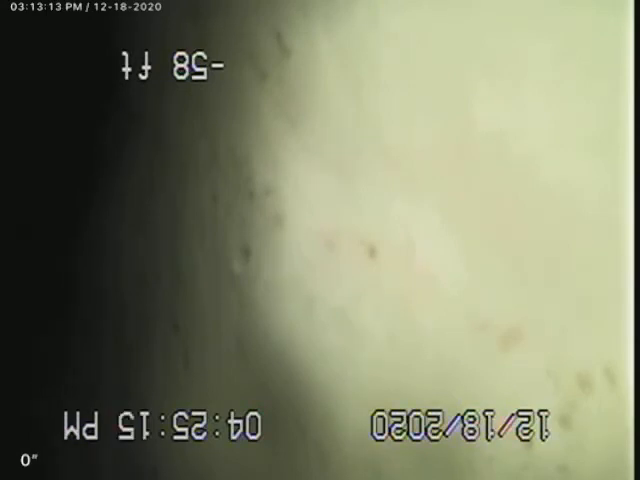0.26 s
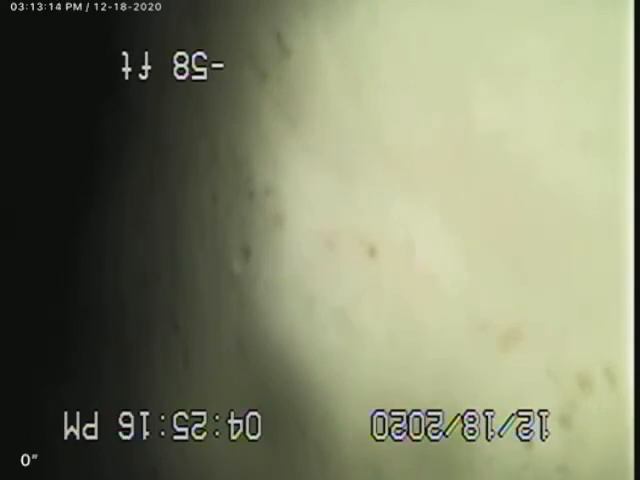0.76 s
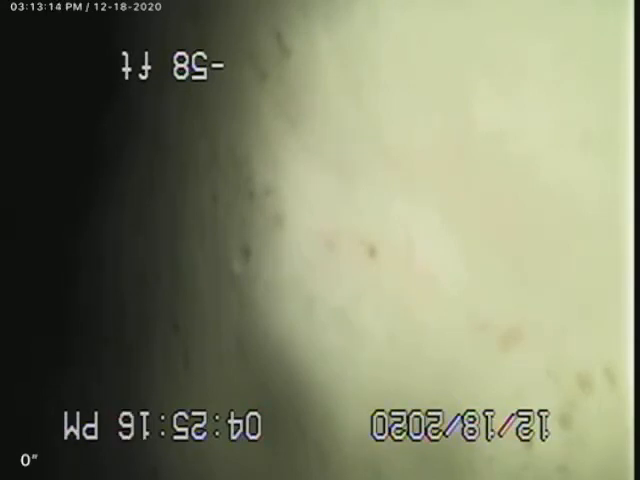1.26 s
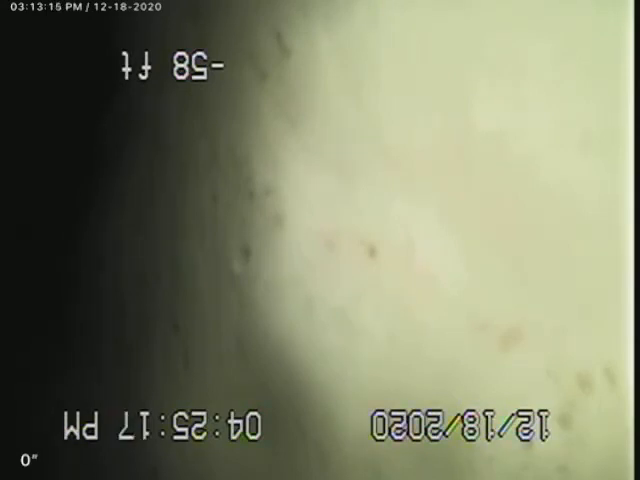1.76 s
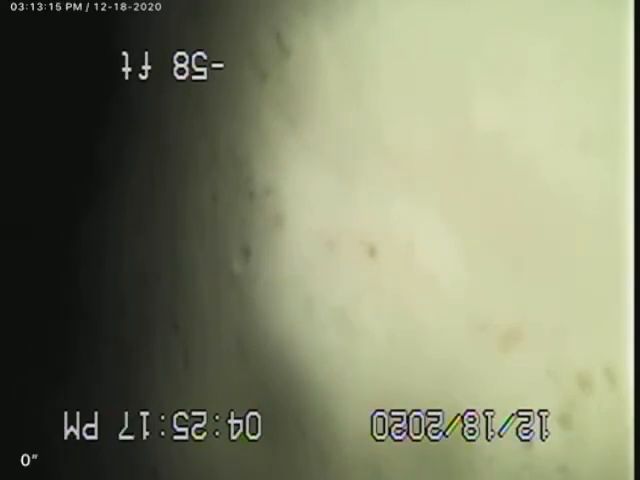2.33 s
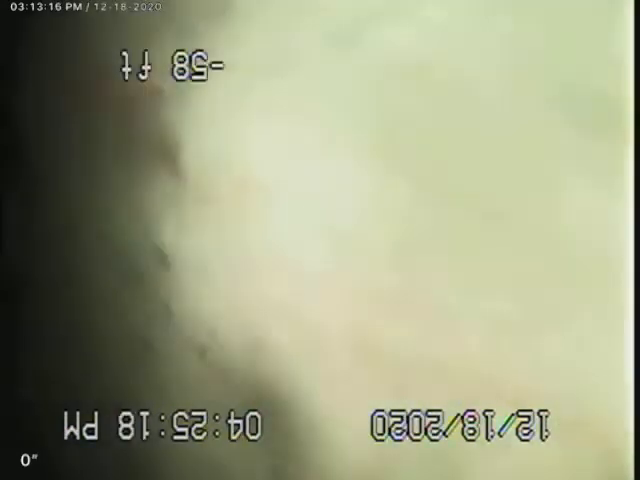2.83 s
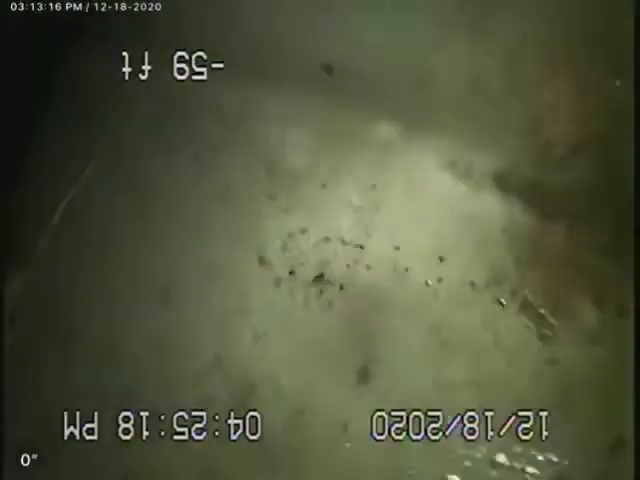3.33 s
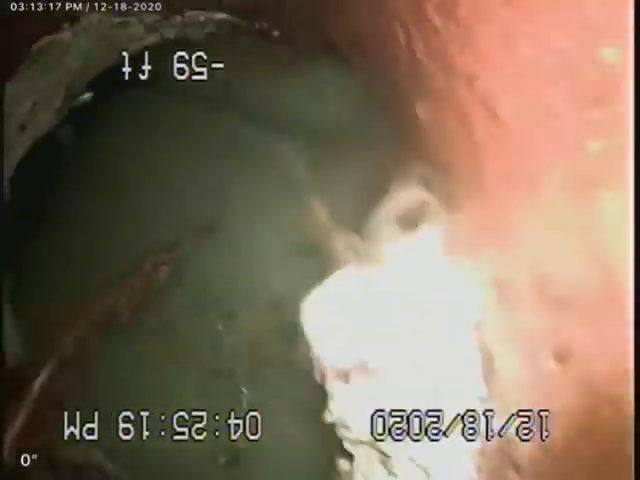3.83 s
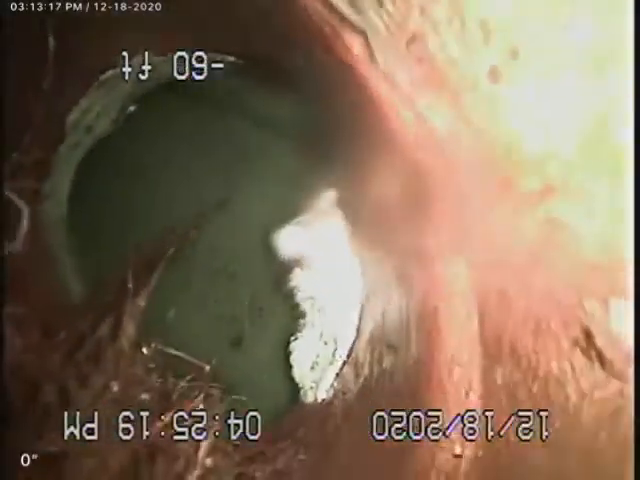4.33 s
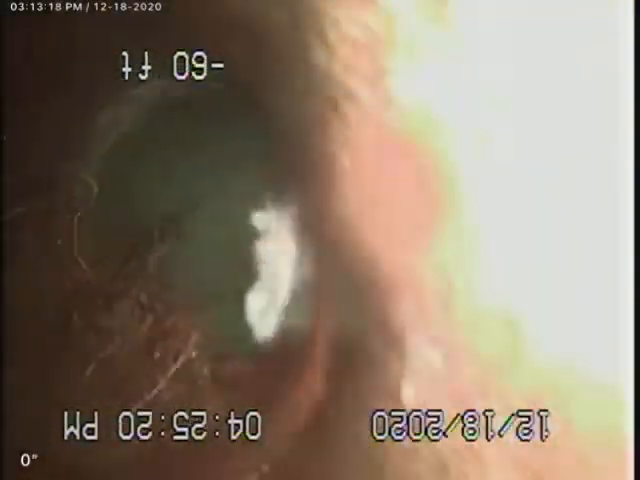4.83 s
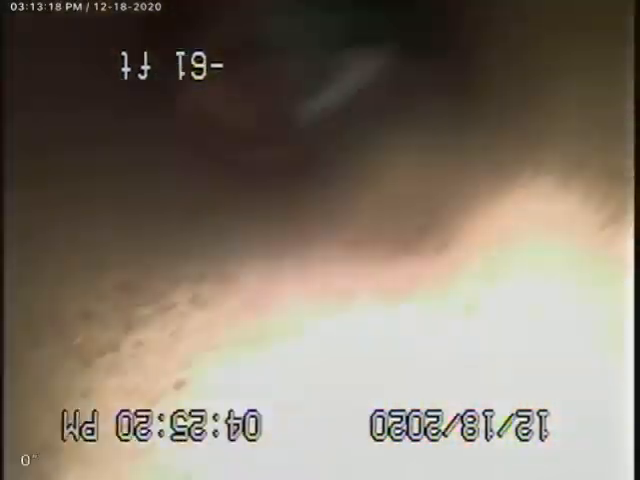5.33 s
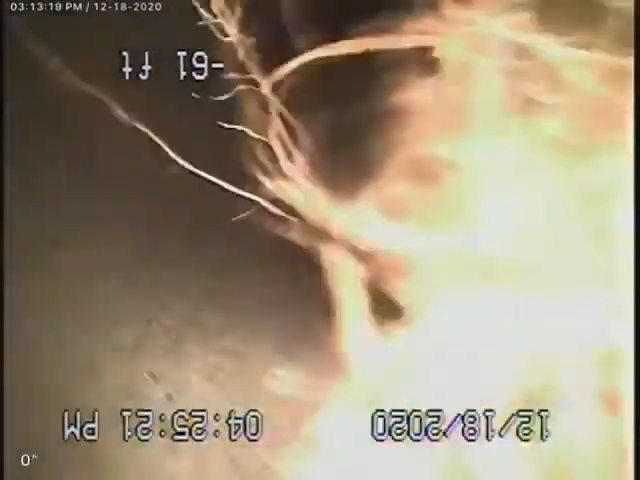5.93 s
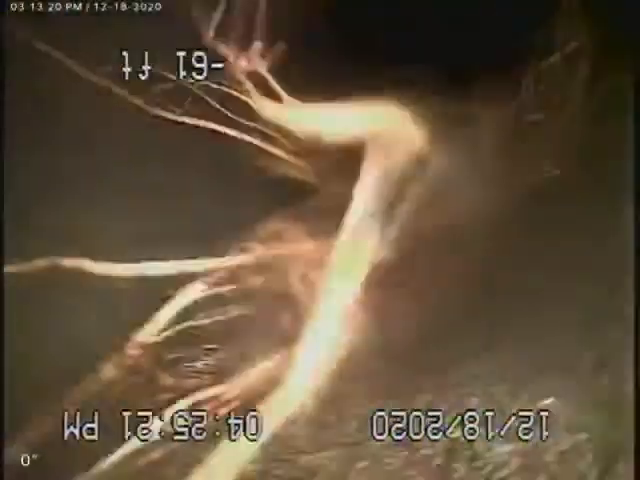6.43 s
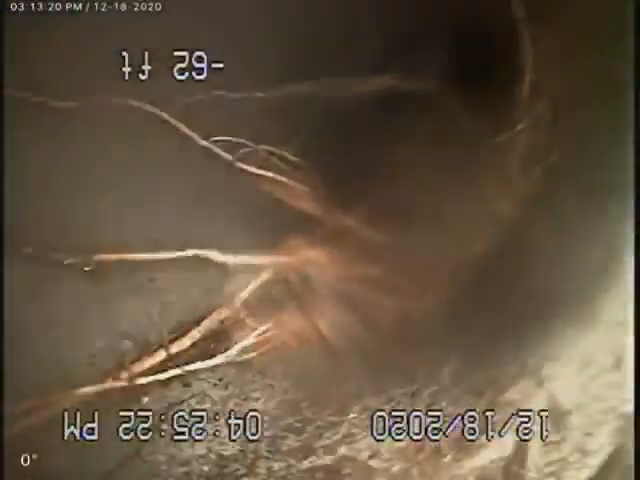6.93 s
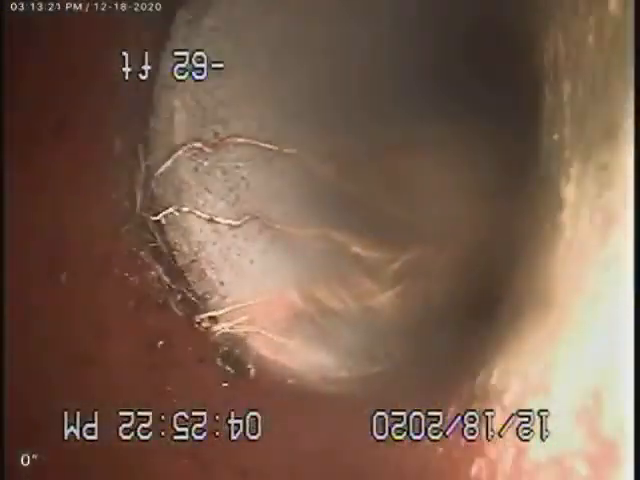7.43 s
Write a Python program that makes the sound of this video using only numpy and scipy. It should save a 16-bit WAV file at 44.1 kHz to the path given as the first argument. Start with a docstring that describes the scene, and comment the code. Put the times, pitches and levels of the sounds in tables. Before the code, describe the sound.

A low, slightly wavering equipment hum runs throughout, heard near the reel of a sewer camera's push rod. In the first second, gripping the rod gives faint dry rasps and light clicks, with a sharper click and soft thumps around 1 second. At about 1.3 seconds a rasp and a quick rattle of clicks briefly ring the reel's frame. The rod then slides in uneven strokes, hissing along its guide and rubbing the reel with a scraping rumble. The loudest knocks cluster with a thump from 2 to 2.3 seconds, each a short, springy falling chirp that rings the coil. A sharp click comes near 2.7 seconds. More knocks land around 2.8, 3.4, 3.7 and 4.7 seconds amid swells of rubbing. From 5 seconds the sliding continues with lighter knocks and a few faint ticks until the end, near 7.7 seconds.

```python
"""At a sewer pipe, a camera's push rod is fed off its reel over the low hum of the equipment.
Gripping it gives dry stick-slip rasps, clicks that ring the reel's frame, and soft thumps.
It then slides in strokes, hissing along its guide, rubbing and slapping against the reel.
Each knock runs down the springy rod as a falling chirp and sets the coil ringing."""
import sys
import numpy as np
from scipy import signal
from scipy.fft import rfft, irfft, next_fast_len
from scipy.io import wavfile
from scipy.ndimage import uniform_filter1d, map_coordinates

SR = 44100
rng = np.random.default_rng(int(sys.argv[2]) if len(sys.argv) > 2 else 0)


def int16_out(signal):
    """Quantize to a 16-bit WAV file."""
    q = np.round(np.clip(np.atleast_2d(signal).T, -1, 1) * 32767)
    wavfile.write(sys.argv[1], SR, q.astype(np.int16))


N = 339129
TIME_S = np.arange(N) / SR

# Modes of the coil in its reel. Each row: frequency in Hz, width in Hz, gain in dB.
COIL_MODES = [(150.5, 12, 2), (172.1, 14.7, 2.5), (206.4, 27, -7), (298.8, 21.2, -3), (414, 100, -22),
              (566.5, 53, -5), (654, 36, -6), (908, 91, -16.5), (1170, 55, -14.5), (1333, 77, -15.5),
              (1600, 130, -19.5), (1764, 43, -16.5), (2050, 22, -15.5), (2310, 32, -24.5), (2905, 68, -17),
              (3380, 38, -21.5)]


def amp(db):
    """Decibels to gain."""
    return 10 ** (np.asarray(db) / 20)


def unit(x):
    """Scale to rms 1."""
    return x / np.sqrt(np.mean(x ** 2) + 1e-20)


def add(mix, start_s, sound):
    """Mix a sound in at start_s."""
    part = mix[max(round(start_s * SR), 0):][:len(sound)]
    part += sound[:len(part)]


def bins_hz(size):
    """FFT bin frequencies, floored at 1 Hz."""
    return np.maximum(np.fft.rfftfreq(size, 1 / SR), 1)


def colour(points, hz):
    """Gain at hz of a spectrum given as (Hz, dB) points."""
    points_hz, db = np.transpose(points)
    return amp(np.interp(np.log(hz), np.log(points_hz), db))


def shaped(x, points):
    """Filter x by a spectrum, to rms 1."""
    size = next_fast_len(len(x))
    return unit(irfft(rfft(x, size) * colour(points, bins_hz(size)), size)[:len(x)])


def response(modes, hz):
    """Frequency response of damped modes."""
    return sum(amp(db) / (1 + 1j * (hz ** 2 - mode_hz ** 2) / (hz * width_hz))
               for mode_hz, width_hz, db in modes)


def causal(gain):
    """Minimum phase for a gain curve: nothing sounds before the blow."""
    cepstrum = irfft(np.log(gain + 1e-6))
    half = len(cepstrum) // 2
    return np.exp(rfft(2 * cepstrum[:half], len(cepstrum)) - cepstrum[0])


def drift(rate_hz):
    """Slow random wander, rms 1."""
    knots = rng.standard_normal(2048)
    return unit(map_coordinates(knots, [TIME_S * rate_hz], order=1, mode="wrap"))


def held(x, span_s=0.09):
    """Hold the slow level at rms 1; keep the fast flutter."""
    power = uniform_filter1d(x ** 2, size=round(span_s * SR))
    return x / np.sqrt(np.abs(power) + 1e-12)


def hum(noise_db=-51.5, waver_db=2.3, wander_turns=0.16):
    """Low machine tones waver and beat above a steady noise."""
    # Machine tones. Each row: frequency in Hz, rms level in dB.
    tones = [(32.5, -44.5), (42.4, -60), (43.4, -49), (48.8, -53), (58.9, -64), (97.4, -52), (156.2, -55.5),
             (363, -68.5), (966, -74)]
    # Background spectrum. Each row: frequency in Hz, relative density in dB.
    noise_colour = [(15, -15.5), (35, -8), (70, -2), (125, -7.5), (185, -13), (260, -8), (340, -15),
                    (450, -18.5), (1500, -18.5), (3200, -25), (4800, -30), (5700, -28.5), (6800, -36)]
    out = amp(noise_db) * shaped(rng.standard_normal(N), noise_colour)
    for hz, db in tones:
        turns = hz * TIME_S + rng.random() + wander_turns * drift(rate_hz=2.1)
        peak = np.sqrt(2) * amp(db + waver_db * drift(rate_hz=6))
        out += peak * np.sin(2 * np.pi * turns)
    return out


def grit(size, per_s, spread_db):
    """Friction: tiny slips of uneven strength at random moments."""
    strength = amp(spread_db * np.minimum(rng.exponential(1, size), 4))
    return unit(rng.standard_normal(size) * strength * (rng.random(size) < per_s / SR))


def rasps(taper_share=0.16):
    """The rod sticks and slips through a grip in short runs."""
    # Each row: start in seconds, end in seconds, level in dB, tilt in dB per octave.
    runs = [(0.15, 0.185, -47, 14), (0.552, 0.59, -40, 5), (0.588, 0.619, -45, 3), (.97, 1.098, -47, -2.5),
            (1.293, 1.367, -34, -0.3), (1.489, 1.559, -47.5, -2.5), (2.224, 2.253, -40, 1),
            (2.657, 2.705, -40.5, -2.5)]
    # Rasp spectrum before tilt. Each row: frequency in Hz, relative density in dB.
    rasp_colour = [(60, -10), (200, 1), (700, -7), (1300, -2), (2100, -3), (3500, -2.5), (4500, -4),
                   (5700, -5.5), (6800, -10)]
    out = np.zeros(N)
    for start_s, end_s, db, db_per_octave in runs:
        slips = grit(round((end_s - start_s) * SR), per_s=7000, spread_db=2.0)
        tilted = [(hz, level_db + db_per_octave * np.log2(hz)) for hz, level_db in rasp_colour]
        taper = signal.windows.tukey(len(slips), taper_share)
        add(out, start_s, amp(db) * shaped(slips, tilted) * taper)
    return out


def tick_level_db(clack_db, pitch_hz, chatter_s, typical_hz=1300, typical_chatter_s=0.0056):
    """A blow ticks louder the higher its pitch and the longer it chatters."""
    return clack_db + 5.5 * np.log2(pitch_hz / typical_hz) + 2.5 * np.log2(chatter_s / typical_chatter_s)


def strike(levels_db, pitch_hz, chatter_s, body, *, chatter_gain, tail_gain, tail_s, soft_s,
           focus_db, focus_octaves, ping_db, ping_octaves=0.09):
    """One contact and its dying chatter, heard through a body as thud, clack and tick."""
    # Spectra of the three parts. Each row: frequency in Hz, relative density in dB.
    thud_colour = [(25, -30), (80, 0), (140, -1), (215, -4.5), (300, -2.5), (480, -14), (900, -57.5)]
    clack_colour = [(200, -43), (400, -3.5), (580, 3), (790, -1.5), (1000, 0), (1900, -1), (2600, -2),
                    (4500, -29)]
    tick_colour = [(1200, -12.5), (2600, 10.5), (3600, 5), (4900, -1.5), (5900, -0.5), (7000, -14)]
    t = np.arange(2 * len(body) - 2) / SR
    hz = bins_hz(len(t))
    age = t / chatter_s
    hardness = np.exp(-(chatter_s / soft_s) ** 2)  # a long contact starts softly, as a scuff
    chatter, tail = rng.standard_normal((2, len(t)))
    chatter = chatter * (hardness + np.sqrt(age)) * np.exp(-age)
    tail = tail * (1 - np.exp(-age)) * np.exp(-t / tail_s)
    force = hardness * (t == 0) + chatter_gain * chatter / np.linalg.norm(chatter)
    force += tail_gain * tail / np.linalg.norm(tail)
    # The struck spot picks the pitch and rings briefly there.
    octaves = np.log2(hz / pitch_hz)
    focus = amp(focus_db * np.exp(-(octaves / focus_octaves) ** 2))
    ping = amp(ping_db / (1 + (octaves / ping_octaves) ** 2))
    rolloff = 1 / np.sqrt(1 + (hz / (2.1 * pitch_hz)) ** 6)
    clack_gain = colour(clack_colour, hz) * focus * ping * rolloff
    gains = (colour(thud_colour, hz), clack_gain, colour(tick_colour, hz))
    spectrum = rfft(force) * body
    out = 0
    for gain, db in zip(gains, levels_db):
        part = irfft(spectrum * causal(gain))
        peak_rms = np.sqrt(uniform_filter1d(part ** 2, size=256).max())
        out += amp(db) * part / peak_rms
    return out


def clicks(trim_db=-1, tick_trim_db=-6, direct_gain=1.0):
    """Dry handling blows ring the frame and leave the coil still."""
    # Each row: start in seconds, clack and thud in dB before trim, pitch in Hz, chatter in seconds.
    blows = [(.159, -51, -48, 1600, 0.014), (0.249, -49, -46, 2000, 0.0064), (.363, -49, -52, 2600, .003),
             (.563, -45, -44.5, 560, 0.0093), (.582, -39, -36.5, 606, 0.0035),
             (.596, -37.5, -32, 600, 0.0024), (.616, -40.5, -35, 604, 0.01),
             (.931, -39.5, -31.5, 1100, 0.0084), (.938, -27.5, -27, 2250, 0.0034),
             (.989, -34, -44, 2850, .0022), (1.053, -40.5, -48, 2170, .007),
             (1.084, -45.5, -47, 1200, 0.012), (1.298, -26.5, -39, 1500, .003),
             (1.309, -24.5, -37, 1300, 0.0039), (1.318, -23.5, -33, 1100, .003),
             (1.329, -24, -29, 1600, 0.0064), (1.338, -28.5, -43, 1400, 0.0027),
             (1.346, -31, -39, 1200, .003), (1.357, -23, -34, 2000, 0.0054), (1.376, -25, -22, 960, 0.0022),
             (1.480, -35, -45, 1600, 0.0035), (1.736, -46, -53, 2000, 0.0049),
             (2.651, -27, -54, 1900, 0.0065), (2.655, -26.5, -54, 2000, 0.0025),
             (4.961, -38, -52, 2400, 0.0042), (6.309, -46, -53, 2700, 0.0042),
             (7.1, -44, -56, 2800, 0.0057), (7.514, -42, -56, 2400, 0.0064)]
    # Modes of the reel's frame. Each row: frequency in Hz, width in Hz, gain in dB.
    frame_modes = [(254, 80, -2), (368, 51, -4.5), (560, 40, -7.5), (1120, 110, -0.5), (1653, 46, -3.5),
                   (1900, 79, 2.5), (2160, 180, 4.5), (2830, 77, -2), (4250, 110, -7), (4600, 200, 3),
                   (5770, 450, -1)]
    body = direct_gain + response(frame_modes, bins_hz(2 ** 13))
    out = np.zeros(N)
    for start_s, clack_db, thud_db, pitch_hz, chatter_s in blows:
        tick_db = tick_level_db(clack_db, pitch_hz, chatter_s) + tick_trim_db
        click = strike((thud_db + trim_db, clack_db + trim_db, tick_db), pitch_hz, chatter_s, body,
                       chatter_gain=1.35, tail_gain=0.47, tail_s=0.043, soft_s=0.011,
                       focus_db=7, focus_octaves=0.43, ping_db=5)
        add(out, start_s, click)
    return out


def thumps(sag_share=0.43):
    """The jostled reel makes a few slow swings that sink in pitch."""
    # Each row: start in seconds, peak in dB, starting pitch in Hz, length in seconds.
    jolts = [(0.935, -29, 127.6, 0.03), (1.084, -30, 85, 0.036), (1.386, -34, 79.4, .05),
             (2.023, -27.5, 100, 0.033)]
    out = np.zeros(N)
    for start_s, db, hz, length_s in jolts:
        progress = np.linspace(0, 1, round(length_s * SR))
        turns = np.cumsum(hz * (1 - sag_share * progress)) / SR
        add(out, start_s, amp(db) * np.sin(np.pi * progress) * np.sin(2 * np.pi * turns))
    return out


def slide_gains(edge_db=-10.5, push_rumble_db=-0.5, push_scrape_db=-1, rub_hiss_db=-11):
    """Rumble, scrape and hiss gains: each push speeds up and eases off; dragging loops add swells."""
    # Pushes of the rod. Each row: start, fastest moment and end in seconds, peak hiss in dB.
    pushes = [(1.38, 1.52, 1.68, -52), (1.865, 1.98, 2.38, -53), (2.1, 2.7, 3.23, -45.5),
              (3.15, 3.447, 3.86, -53.5), (3.897, 4.38, 4.5, -53.5), (4.692, 4.947, 5.6, -50.5),
              (5.7, 5.843, 6.5, -52), (6.55, 7.3, 8.4, -55.5)]
    # Loops dragging on the reel.
    # Each row: middle and length in seconds, scrape and rumble in dB before trim.
    rubs = [(1.55, 0.12, -59, -43), (2.31, 0.45, -51, -35), (2.615, 0.17, -47, -44),
            (2.751, 0.18, -46, -37.5), (3.028, 0.18, -49.5, -39.5), (3.242, 0.092, -46, -41.5),
            (3.355, .08, -43.5, -40.5), (3.455, 0.23, -46.5, -34), (3.62, 0.28, -42.5, -36.5),
            (3.756, 0.11, -55, -35.5), (4.275, .1, -47.5, -51), (4.407, 0.23, -52, -44.5),
            (4.536, 0.13, -55, -44.5), (4.793, 0.27, -45, -37), (4.983, 0.32, -56.5, -43),
            (5.363, 0.18, -48, -41), (5.591, .18, -43, -37.5), (6.017, .14, -51, -44.5),
            (6.142, 0.19, -43.5, -35), (6.624, 0.13, -58.5, -50), (6.764, 0.12, -51.5, -38.5),
            (6.959, 0.21, -48, -40.5), (7.076, 0.17, -50.5, -39), (7.355, 0.19, -43.5, -34.5),
            (7.494, 0.24, -60, -44.5), (7.685, 0.093, -45.5, -30.5)]
    push_power = rumble_power = scrape_power = 0
    for start_s, fastest_s, end_s, db in pushes:
        before = (fastest_s - TIME_S) / (fastest_s - start_s)
        after = (TIME_S - fastest_s) / (end_s - fastest_s)
        away = np.maximum(before, after)  # 0 at the fastest moment, 1 at either end
        push_power += amp(db + edge_db * np.maximum(away, away ** 4)) ** 2
    for middle_s, length_s, scrape_db, rumble_db in rubs:
        swell = np.cos(np.pi * np.clip((TIME_S - middle_s) / length_s, -0.5, 0.5))
        rumble_power += (amp(rumble_db) * swell) ** 2
        scrape_power += (amp(scrape_db) * swell) ** 2
    return np.sqrt([rumble_power + push_power * amp(push_rumble_db) ** 2,
                    scrape_power + push_power * amp(push_scrape_db) ** 2,
                    push_power + scrape_power * amp(rub_hiss_db) ** 2])


def slide(rumble_trim_db=-1, scrape_trim_db=-1.5, direct_gain=0.19, judder_rms_db=2.5):
    """The moving rod rubs unevenly on the reel, which rumbles, and hisses along its guide."""
    # Friction spectra. Each row: frequency in Hz, relative gain in dB.
    rumble_colour = [(50, -13), (100, 6), (135, -1), (170, 5), (240, -1.5), (310, 0.5), (450, -15),
                     (650, -29), (1200, -48.5)]
    scrape_colour = [(250, -19), (450, 3.5), (650, 0.5), (800, 2.5), (1100, 4.5), (1700, -5.5), (3000, -9),
                     (6500, -28)]
    hiss_colour = [(600, -14), (1500, 2), (2600, 1.5), (3800, -1.5), (5000, -5), (5900, -1.5),
                   (6800, -11.5)]
    rumble_gain, scrape_gain, hiss_gain = slide_gains()
    judder_db = judder_rms_db * drift(rate_hz=35)
    rubbing = grit(N, per_s=3000, spread_db=1.0) * amp(judder_db)
    size = next_fast_len(N)
    body = direct_gain + response(COIL_MODES, bins_hz(size))
    coil = irfft(rfft(rubbing, size) * body, size)[:N]
    fizz = grit(N, per_s=12000, spread_db=-0.5) * amp(0.64 * judder_db)
    return (rumble_gain * amp(rumble_trim_db) * held(shaped(coil, rumble_colour))
            + scrape_gain * amp(scrape_trim_db) * held(shaped(coil, scrape_colour))
            + hiss_gain * shaped(fizz, hiss_colour))


def knocks(tick_trim_db=-13, direct_gain=0.09, max_ring_gain=0.52, ring_build_s=0.0023,
           dispersion_s=0.00698):
    """The rod slaps the reel; bending waves are slower at low pitch, so the bass comes late."""
    # Each row: start in seconds, clack and thud in dB, pitch in Hz, chatter in seconds.
    slaps = [(2.017, -21.5, -23, 850, .001), (2.048, -18, -20.5, 1350, .006),
             (2.064, -27.5, -23.5, 1080, 0.0093), (2.101, -33, -26, 1250, .006),
             (2.221, -26.5, -25.5, 1600, 0.0042), (2.239, -32.5, -34, 2050, 0.0077),
             (2.311, -28.5, -49, 1750, 0.0059), (2.33, -36.5, -28.5, 1700, .004),
             (2.694, -38.5, -36.5, 920, 0.0054), (2.823, -26.5, -34, 1750, .006),
             (3.386, -27.5, -28, 1075, 0.0058), (3.445, -40.5, -39, 1080, .016),
             (3.661, -34, -42, 720, 0.0017), (3.698, -28, -27, 1160, .0034),
             (4.379, -46.5, -46.5, 950, .011), (4.429, -44, -37.5, 950, .014),
             (4.441, -34.5, -40, 955, .003), (4.688, -40, -35, 930, 0.0066),
             (4.735, -23.5, -24.5, 920, .0035), (4.762, -36, -30, 855, 0.0017),
             (4.921, -34, -33.5, 1100, 0.0025), (5.870, -32, -31.5, 950, .009),
             (6.062, -41, -39, 906, .008), (6.113, -37, -43, 900, 0.0017), (6.519, -48, -60, 1066, 0.0033),
             (6.955, -40.5, -39, 900, 0.0099), (7.060, -45, -39, 1100, .013),
             (7.308, -38.5, -36, 860, 0.013), (7.645, -38.5, -35.5, 796, .005)]
    hz = bins_hz(2 ** 14)
    coil = response(COIL_MODES, hz)
    chirp = np.exp(-4j * np.pi * dispersion_s * (np.sqrt(200 * hz) - hz / 12))
    out = np.zeros(N)
    for start_s, clack_db, thud_db, pitch_hz, chatter_s in slaps:
        # Longer contact rings the coil more.
        ring_gain = max_ring_gain * (1 - np.exp(-(chatter_s / ring_build_s) ** 2))
        body = (direct_gain + ring_gain * coil) * chirp
        tick_db = tick_level_db(clack_db, pitch_hz, chatter_s) + tick_trim_db
        knock = strike((thud_db, clack_db, tick_db), pitch_hz, chatter_s, body,
                       chatter_gain=1.5, tail_gain=0.42, tail_s=0.055, soft_s=0.0093,
                       focus_db=5.5, focus_octaves=0.72, ping_db=4.5)
        add(out, start_s, knock)
    return out


def scene():
    """All sources in mono, near the reel."""
    return (hum() + rasps() + clicks() + thumps() + slide() + knocks())[None]


def record(dry):
    """A steep low-pass cuts the top treble."""
    cutoff_hz = 6900
    lowpass = signal.firwin(301, cutoff_hz, window=("kaiser", 8), fs=SR)
    return signal.oaconvolve(dry, lowpass[None], "same")


dry = scene()
out = record(dry)
int16_out(out)
```